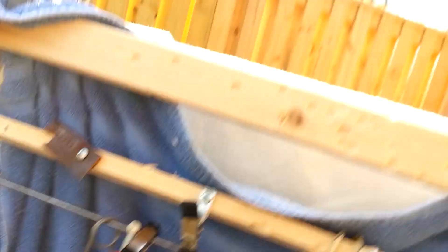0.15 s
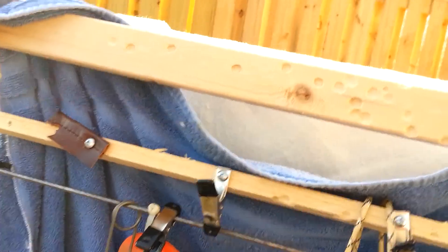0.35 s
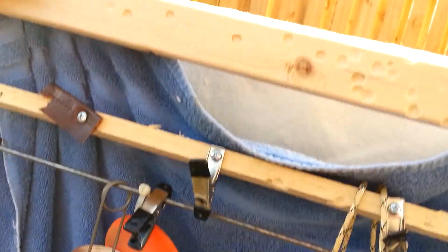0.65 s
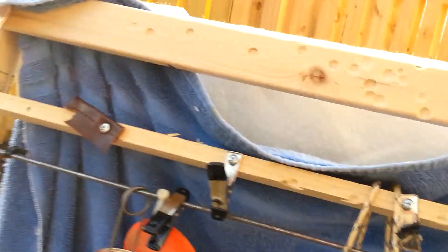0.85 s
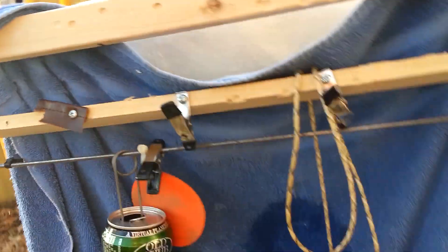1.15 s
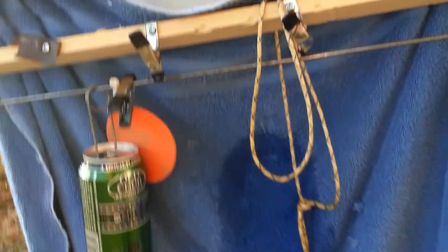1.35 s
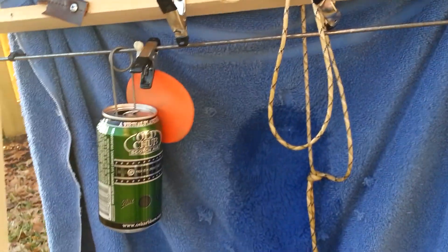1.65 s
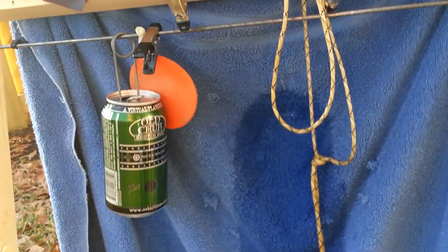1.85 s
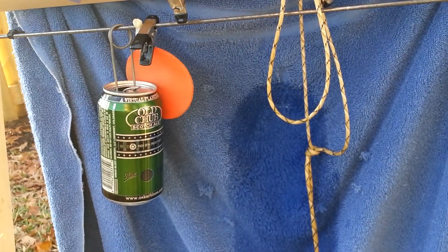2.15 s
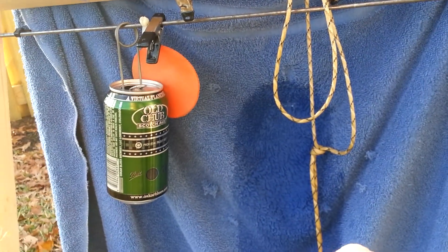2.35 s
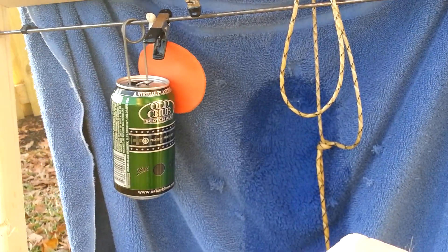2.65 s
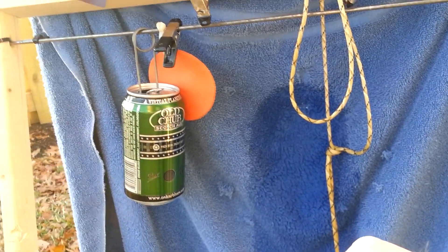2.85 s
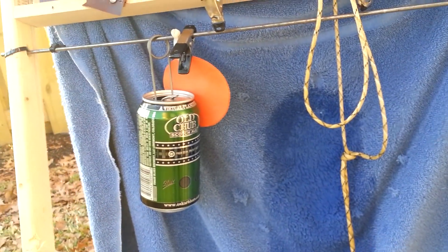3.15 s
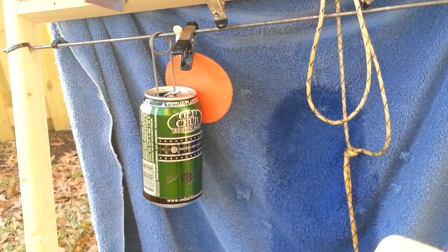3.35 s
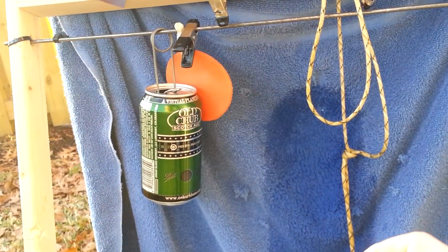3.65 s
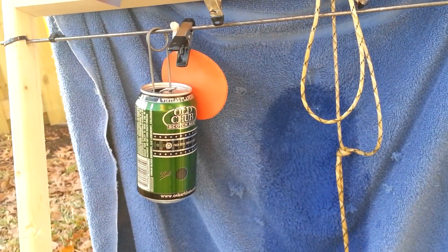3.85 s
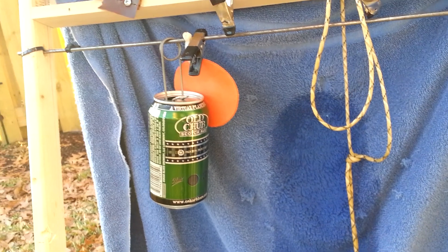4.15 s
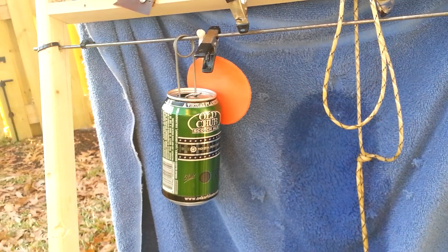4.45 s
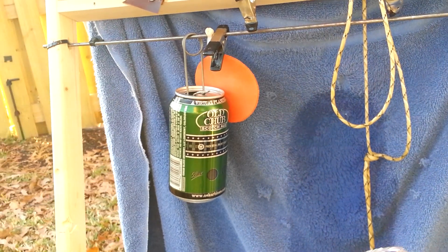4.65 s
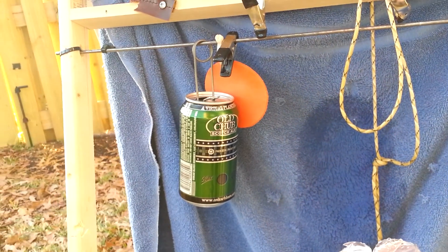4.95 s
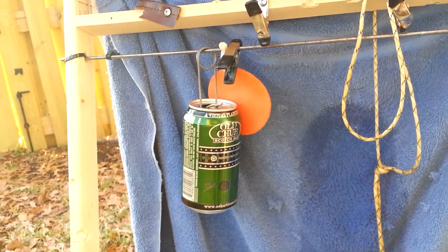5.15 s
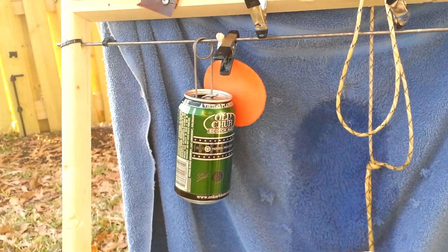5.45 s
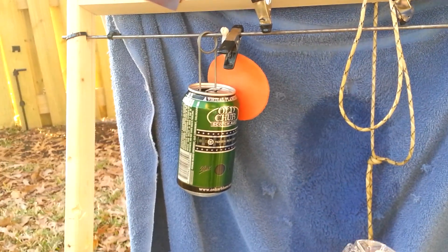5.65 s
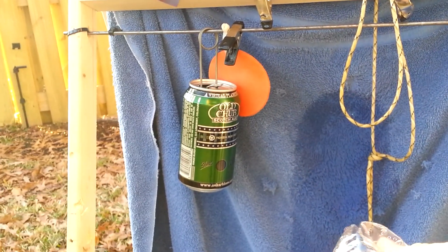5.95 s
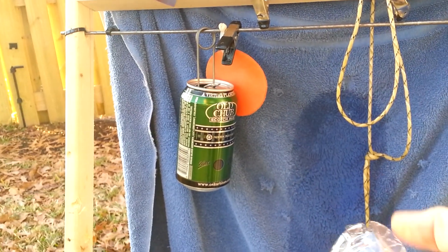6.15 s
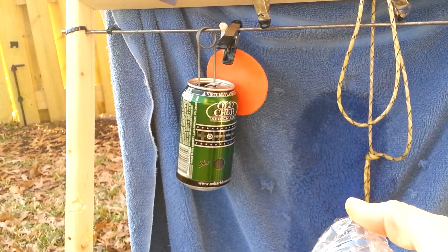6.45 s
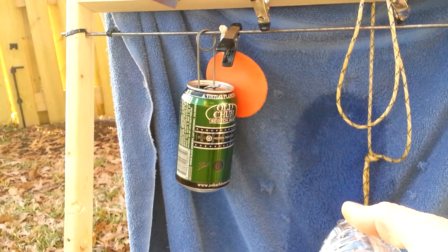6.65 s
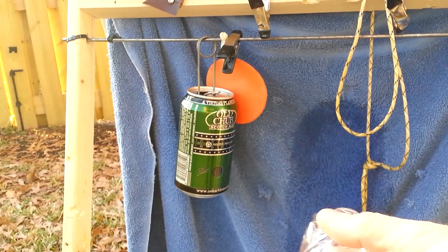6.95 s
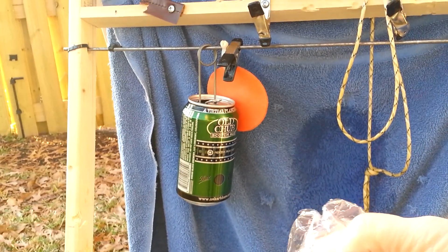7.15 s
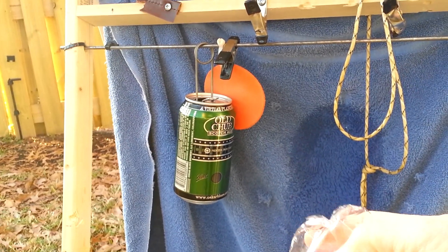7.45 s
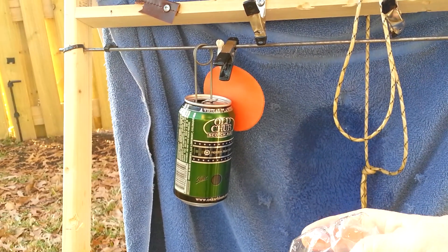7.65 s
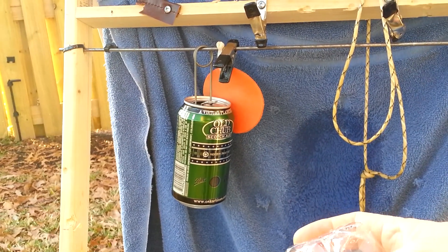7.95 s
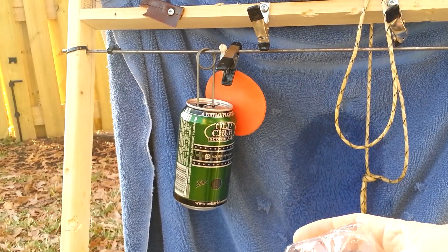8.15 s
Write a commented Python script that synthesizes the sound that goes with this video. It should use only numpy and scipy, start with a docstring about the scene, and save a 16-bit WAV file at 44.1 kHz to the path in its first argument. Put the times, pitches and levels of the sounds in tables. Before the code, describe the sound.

Sharp plastic crackles and hollow pops from a crumpling bottle, very close and slightly overloaded, gather in dense bunches against faint outdoor air and a distant motor hum.

```python
"""Buckling of a thin plastic bottle

A thin plastic bottle is squeezed and kneaded close by in a quiet yard with a far-off motor.
Creases buckle in bunches as short bursts of dense wall modes, with fine crinkle between them.
Broad panels flex with a hollow note of sagging harmonics; sliding fingers are filtered random slips.
Resonators add the notes of the still round bottle; the loud snaps overload the microphone.
"""
import sys
import numpy as np
from scipy import signal
from scipy.fft import rfft, irfft, next_fast_len
from scipy.io import wavfile
from scipy.ndimage import uniform_filter1d

SR = 44100
rng = np.random.default_rng(int(sys.argv[2]) if len(sys.argv) > 2 else 0)


def write(x):
    x = np.atleast_2d(x).T
    wavfile.write(sys.argv[1], SR, np.round(np.clip(x, -1, 1) * 32767).astype(np.int16))


N = 366471  # samples

# Open air of the yard: (frequency [Hz], relative density [dB per Hz])
YARD_SPECTRUM = [(20, -27), (40, -27), (65, -9.5), (150, -4), (190, -7), (230, -5.5), (380, -6), (700, -14),
                 (2000, -22.5), (5500, -29), (14500, -28.5)]
# Drone of the far-off motor: (multiple of the shaft speed [-], level [dB])
MOTOR_HARMONICS = [(2, -66.5), (4, -71.5), (5, -55), (8, -73)]
# Fingers slide to a new grip: (middle [s], half length [s], relative level [dB])
FINGER_SLIDES = [(0.226, 0.053, -38.5), (0.41, .05, -36.5), (0.787, 0.0099, -35.5), (0.906, .04, -42.5),
                 (1.203, 0.24, -51), (1.99, .1, -45.5), (2.153, 0.042, -39), (2.81, 0.039, -43),
                 (3.68, 0.05, -28), (4.435, 0.042, -43), (4.533, 0.025, -36)]
# Rubbing of the round bottle, with its broad resonances: (frequency [Hz], relative density [dB per Hz])
ROUND_RUB_SPECTRUM = [(200, -8), (800, -7.5), (1150, -1.5), (1600, -6), (2080, -6), (2700, -7.5),
                      (3500, -6.5), (7000, -13.5), (14500, -24.5)]
# Rubbing of the crushed bottle: (frequency [Hz], relative density [dB per Hz])
CRUSHED_RUB_SPECTRUM = [(200, 5.5), (1200, 2.5), (2300, 0), (3300, -5.5), (4100, -6), (14500, -22.5)]
# Broad panels that bend and swing: (start [s], relative level [dB], mean pitch [Hz], length [s])
PANEL_FLEXES = [(0.248, -30, 332, 0.014), (6.975, -7, 278, 0.014), (7.013, -9, 352, 0.02),
                (7.054, -21, 410, 0.011), (7.071, -23, 344, 0.0092)]
# Notes of the round bottle: (frequency [Hz], gain at resonance [dB], decay by 60 dB [s])
BOTTLE_MODES = [(247, 5.5, 0.081), (1044, 2, 0.071), (1647, -9, 0.024), (2066, -1, 0.03),
                (3596, -11, 0.065)]
# Colour of every snap, from the wall and from the microphone, which dips near 3.3 kHz and rises near 4 kHz:
# (frequency [Hz], relative density [dB per Hz])
SNAP_SPECTRUM = [(200.0, -3.5), (280.0, -1), (450.0, 2), (800.0, 0), (1300.0, 0.5), (1650.0, -1),
                 (2100.0, 1), (2700.0, 2), (3300.0, -5.5), (4000.0, -1.5), (5200.0, -7), (7500.0, -10),
                 (11000.0, -19), (14500.0, -24.5)]
# Snapping creases: (time [s], relative level [dB], pitch of the buckling facet [Hz],
# low-frequency body [dB], high-frequency edge [dB])
CREASE_SNAPS = [(0.2812, -9.5, 3220, -15.5, -5), (0.321, 8.5, 3240, -10.5, 3.5),
                (0.361, -15.5, 1600, -9, -37), (0.464, 2, 5600, -3, 7.5), (0.5517, -6.5, 3500, -16, -33),
                (0.563, -9.5, 1040, -17, 0), (0.79, -24.5, 2780, 3, -8), (0.8038, -17, 3670, 3, 5),
                (0.8391, 0, 920, -12.5, -0.5), (1.1524, -16, 3200, -7.5, -10), (1.183, -9, 3300, -10.5, -8),
                (1.3969, -34.5, 1400, 29, -10), (1.6571, -12, 1360, 2, 0), (1.756, -20, 3800, -4, -1),
                (1.8456, -13.5, 1360, -2, -12), (1.9103, 1, 2730, -13, 5.5), (1.9283, -11.5, 2070, 0, 14),
                (1.947, -11, 2100, 0, 10), (1.9559, -15.5, 1540, 9.5, 12), (2.0318, -20.5, 1390, -3, -8),
                (2.0773, -17, 1400, 5, -8), (2.333, -17.5, 2470, -14, -19), (2.4338, -18, 2080, -5, -23),
                (2.4572, -12, 1070, -2.5, -16.5), (2.514, -15.5, 1230, 11, -19),
                (2.5904, -8.5, 725, -11, -9.5), (2.8827, -13, 4330, -25, 18), (2.9128, -1, 4080, -27, -6),
                (2.9195, 3.5, 4000, -34, -4.5), (2.978, -2, 1490, -20, -3.5), (3.04, -14.5, 1400, -14, -26),
                (3.0826, -12, 1550, 5.5, -33), (3.1775, -8.5, 4500, -10, 18), (3.2398, -14, 790, -1.5, -61),
                (3.3897, -10, 4420, -12, 15.5), (3.4888, -15, 1760, -3, -22), (3.5006, -8, 810, -1, -26),
                (3.5305, -6, 2200, -7, -4), (3.537, -8, 1980, -4, -25), (3.5521, 4, 1180, 1, 17),
                (3.6259, -12, 710, -12, 4), (3.6446, -12.5, 1000, -5, -8), (3.6613, -10.5, 1520, 12, -13),
                (3.687, 0, 2250, -13, 17.5), (3.7001, -3, 10800, -5, 7), (3.7047, 1, 500, -7, 16.5),
                (3.7149, -6.5, 350, -6, -10), (3.7373, 3.5, 5100, -10, 5.5), (3.7752, -5, 2820, -1, 8),
                (3.779, -7.5, 3000, 0, 14), (3.7982, -7.5, 790, -9.5, 2), (3.8274, -14.5, 1100, -8, -2),
                (3.8608, 5.5, 4260, -7.5, 5), (3.935, -0.5, 2250, -1, 5.5), (4.0075, -12, 1100, -8, -12),
                (4.0176, -5, 980, -14, 4), (4.031, -18, 1200, -1, -19), (4.0455, -5.5, 2320, -1, 12.5),
                (4.0638, -3, 3200, -31, 11), (4.0725, -3.5, 5000, -23, 9), (4.104, -10, 810, -3, -8),
                (4.1176, 5, 1400, -13.5, 2), (4.126, 7, 2250, -1.5, 13.5), (4.1417, -6, 11000, -8, 4),
                (4.1614, 1.5, 2700, -2, 18.5), (4.193, -17, 770, 1, -5), (4.2725, -10, 8400, -6, 6),
                (4.3102, 4, 1044, 0.5, 2), (4.314, 0.5, 715, -9.5, 2), (4.437, -27.5, 2030, -15, 2),
                (4.5441, -23, 2010, -5, 6), (4.5746, -19, 840, 4, -24), (4.6382, 4, 1930, 1, 16.5),
                (4.659, -21, 4400, -11, 2), (4.6702, 2, 4900, -14.5, 2), (4.702, -20, 2500, -15, -6),
                (4.712, 2.5, 2060, -2, 18), (4.7296, -8, 740, -11, -5), (4.759, -4.5, 2500, 4.5, 11),
                (4.7888, -8, 2300, -4, 24), (4.796, -8.5, 746, -9.5, -31), (4.8366, -2, 1095, -1.5, -8),
                (4.8594, -5.5, 2660, -3, -10), (4.863, 0.5, 340, -3, 8.5), (4.8746, -11, 1900, 6.5, 14.5),
                (4.9161, -14.5, 820, 14, -4), (5.0196, 0.5, 2620, -6, 15), (5.052, -5, 2740, -1, 13),
                (5.056, -6, 2400, -7, 4), (5.0817, 2.5, 820, -3.5, 8), (5.0936, 0, 2830, -10.5, 4),
                (5.112, -50, 2800, -13, 5), (5.1217, -2.5, 4400, -10, -2), (5.1439, -4, 2440, -10.5, 1.5),
                (5.2502, -21, 4300, -8.5, 10), (5.293, -19, 604, 6, -22), (5.298, 0, 2160, -3.5, 2.5),
                (5.343, -5, 11900, -9.5, 22), (5.3588, -5.5, 3020, -6, 8), (5.369, 1, 4300, -5.5, 18),
                (5.375, 2.5, 2160, 2, 3), (5.3804, -1, 1690, -5.5, 9), (5.3929, -8, 2210, -2, 13),
                (5.4212, -14.5, 4740, 3, 20), (5.4425, -19.5, 2300, 5.5, 0), (5.46, 1.5, 2330, -7.5, 18),
                (5.4653, 3, 4700, -8, 8.5), (5.48, -9, 1100, 1.5, -23.5), (5.4867, -2, 10600, -6.5, 5.5),
                (5.506, 4.5, 2530, -9, 12.5), (5.6805, -24.5, 760, 5.5, -1), (5.7666, -31.5, 595, 3.5, -24),
                (6.3088, -25.5, 3140, 1.5, 5.5), (6.4158, -32, 750, -5, -9.5), (6.4819, -27, 2770, 4.5, -3),
                (6.6771, -20, 575, 1.5, -4.5), (6.745, -22, 3040, -10, -36), (6.893, -25.5, 410, 16, -17),
                (6.9156, -7, 2390, -15, 7), (6.9416, -2, 2250, -9, 7.5), (6.958, -28, 330, 13, 0),
                (6.9708, 0.5, 720, -5, -10), (6.9774, -7.5, 880, 12, -10), (6.994, -16, 2800, -14, 21),
                (7.0652, -18, 2230, 15, 11), (7.0735, -24.5, 1400, 21, -10), (7.1618, -2.5, 9200, -12, 4),
                (7.2014, -11, 360, 2, -1), (7.2221, -5.5, 2300, -10, 1), (7.228, -9, 2960, -10, 17),
                (7.237, -17, 2200, -10, 1), (7.2668, 2.5, 744, -6, -9), (7.303, -5.5, 3780, -13, 6.5),
                (7.37, -8.5, 1350, 1, 15.5), (7.44, -12, 3950, -16, -20), (7.4663, -3, 2210, -1.5, -11),
                (7.4961, 1.5, 1100, -6, 5), (7.5228, -9, 4500, -29, -5), (7.5658, 1.5, 1500, -32, -15.5),
                (7.7123, -2, 2540, -16, 9), (7.7316, 4.5, 2520, -13, 5.5), (7.7459, -2.5, 2600, -3.5, 2),
                (7.9557, -6, 1480, -7.5, 4), (7.9865, -4, 9000, 2.5, 11), (8.0367, -2, 2320, -2, 20.5),
                (8.0856, -7.5, 3300, -4, 0.5), (8.2649, -10, 4460, -15, -5), (8.2933, -6, 9000, -1, 13.5)]

AIR_DB, SHAFT_HZ = -49, 37.6  # rms level of the air; mean shaft speed
CRUSHED_AT_S = 1.31  # from here on the wall is too creased to hold a note
# The skin creeps a little at rest, and more while the wall gives way (relative levels)
REST_DB, CREEP_DB, GIVE_S = -51.5, -33, 0.11
# Nominal 60 dB decay of a lone crease; each neighbour within about CROWD_S adds a share; a round wall
# rings longer by a factor
RING_S, CROWD_S, PER_NEIGHBOUR, ROUND_RING_FACTOR = 0.019, 0.03, 0.059, 1.16
# The lowest note of the wall climbs as kneading divides it into ever smaller panels
LOWEST_HZ, STIFFEN_HZ_PER_S = 160.5, 9
EDGE_HZ, TOP_HZ = 14700, 16000  # band limits of the microphone


def gain_of(db):
    """Level: converts decibels to an amplitude ratio."""
    return 10 ** (np.asarray(db) / 20)


def evened(x):
    """Normalization: scales a signal to unit rms."""
    return x / np.sqrt(np.mean(x ** 2) + 1e-20)


def read(points, hz):
    """Interpolation: reads a spectrum on a logarithmic frequency axis."""
    f, value = np.transpose(points)
    return np.interp(np.log(hz + 1), np.log(f + 1), value)


def add(mix, s, sound):
    """Superposition: adds a sound to the mix at time s."""
    part = mix[max(round(s * SR), 0):][:len(sound)]
    part += sound[:len(part)]


def coloured(x, points):
    """Linear filtering: gives a steady sound a spectrum, at unit rms."""
    size = next_fast_len(N)
    gain = gain_of(read(points, np.fft.rfftfreq(size, 1 / SR)))
    return evened(irfft(rfft(x, size) * gain, size)[:N])


def wander(per_s):
    """Random modulation: joins per_s random values a second by lines, at unit rms."""
    knots = rng.standard_normal(4000)
    return evened(np.interp(np.arange(N) / SR * per_s, np.arange(len(knots)), knots))


def causal(gain):
    """Causality: the minimum-phase response rings after a blow, never before."""
    log_gain = np.log(np.maximum(gain, gain.max() * 1e-5))
    circle = np.r_[log_gain, log_gain[-2:0:-1]]
    return np.exp(np.conj(signal.hilbert(circle)))[:len(gain)]


def low_pass(x, hz):
    """Band limitation: a steep linear-phase filter."""
    return signal.oaconvolve(x, signal.firwin(301, hz, window=("kaiser", 8), fs=SR), "same")


def yard(waver_hz=0.16):
    """Stationary noise and rotation: an outdoor wash with the harmonics of a wavering shaft."""
    air = gain_of(AIR_DB) * coloured(rng.standard_normal(N), YARD_SPECTRUM)
    shaft = 2 * np.pi * np.cumsum(SHAFT_HZ + waver_hz * wander(11)) / SR
    drone = 0
    for multiple, db in MOTOR_HARMONICS:
        harmonic = np.sin(round(multiple) * shaft) * (1 + 0.24 * wander(5))
        drone = drone + gain_of(db) * evened(harmonic)
    return air + drone


def roundness(fade_s=0.19):
    """Loss of shape: falls from 1 for a round bottle to 0 for a crushed one."""
    return np.clip((CRUSHED_AT_S - np.arange(N) / SR) / fade_s, 0, 1)


def sliding():
    """Sliding contact: each slide of the fingers swells and fades as a Gaussian."""
    t = np.arange(N) / SR
    return sum(gain_of(db) * np.exp(-((t - s) / half) ** 2) for s, half, db in FINGER_SLIDES)


def strain(snaps, seconds):
    """Yielding: the wall gives way in step with the smoothed strength of its snaps."""
    span = int(seconds * SR)
    power = np.tanh(snaps) ** 2
    return np.sqrt(abs(uniform_filter1d(uniform_filter1d(power, span), span)))


def fingers(snaps, crushed_db=-3, round_db=-1, grains_per_s=2500, grain_db=2.5, unsteady_db=1.0, patchy_db=0.95):
    """Stick-slip friction: skin drags over the plastic in countless small slips."""
    grain_gain = gain_of(grain_db * np.minimum(rng.exponential(1, N), 4))
    slips = rng.standard_normal(N) * grain_gain * (rng.random(N) < grains_per_s / SR)
    creep = gain_of(CREEP_DB) * strain(snaps, GIVE_S)
    drag = np.sqrt(gain_of(REST_DB) ** 2 + creep ** 2 + sliding() ** 2)
    whole = gain_of(round_db) * coloured(slips, ROUND_RUB_SPECTRUM)
    crushed = gain_of(crushed_db) * coloured(slips, CRUSHED_RUB_SPECTRUM)
    grip_db = unsteady_db * wander(57) + patchy_db * wander(17)  # the skin catches and lets go
    return drag * gain_of(grip_db) * (roundness() * whole + (1 - roundness()) * crushed)


def stray_ticks(snaps, per_s=22, level_db=-17, slide_db=12, linger_s=0.083, low_hz=900, high_hz=4200):
    """Random buckling: now and then a strained facet gives way between the big snaps."""
    load = strain(snaps, linger_s) + gain_of(slide_db) * sliding()
    out = np.zeros(N)
    for i in np.flatnonzero(rng.random(N) < per_s / SR):
        hz = low_hz * (high_hz / low_hz) ** rng.random()
        add(out, i / SR, load[i] * snap(level_db, hz, RING_S, -2.5, -2))
    return out


def crinkle(snaps, per_s=170, level_db=-22, slide_db=12, spread_db=4, linger_s=0.029, count=12):
    """Crackling noise: tiny creases yield close around big ones and under sliding fingers."""
    load = strain(snaps, linger_s) + gain_of(slide_db) * sliding()
    sizes = gain_of(spread_db * np.minimum(rng.exponential(1, N), 3)) * load
    times = np.flatnonzero(rng.random(N) < per_s / SR)
    facets = [snap(level_db, hz, 0.016, -2.2, 2) for hz in np.geomspace(600, 4500, count)]
    which = rng.integers(0, count, N)
    out = np.zeros(N)
    for i in times:
        add(out, i / SR + linger_s / 2, sizes[i] * facets[which[i]])
    return out


def panels(overtone_db_per_octave=-17, sag=0.04, creak_db=-17, creak_hz=2200, partials=6):
    """Nonlinear flexure: a wide panel swings a few cycles, its note sagging and its folds creaking."""
    out = np.zeros(N)
    for s, db, hz, length in PANEL_FLEXES:
        u = np.arange(0, 1, 1 / (length * SR))  # fraction of the flex
        phase = 2 * np.pi * hz * length * (u + sag * u * (1 - u))
        # the stiff wall bends unevenly, which adds overtones
        swing = sum(gain_of(overtone_db_per_octave * np.log2(k)) * np.sin(k * phase)
                    for k in range(1, partials + 1))
        noise = rng.standard_normal(len(u))
        creak = evened(signal.lfilter(*signal.butter(3, creak_hz, fs=SR), noise))
        swell = np.sin(np.pi * u)
        add(out, s, gain_of(db) * swell * (swing + gain_of(creak_db) * abs(swing) * creak))
    return out


def notes(x):
    """Resonance: every snap sets the damped modes of the still round bottle ringing."""
    t = np.arange(SR // 8) / SR
    ringing = 0
    for hz, db, t60 in BOTTLE_MODES:
        unit_peak = np.log(1e6) / (t60 * SR)  # makes the gain at resonance independent of the decay
        ringing = ringing + gain_of(db - 60 * t / t60) * np.sin(2 * np.pi * hz * t) * unit_peak
    return signal.oaconvolve(x * roundness(), ringing)[:N]


def snap(db, pitch_hz, ring, body_db, edge_db, facet_db=9, facet_share=0.11, least_width_hz=320,
         damping=0.25, low_cut_hz=190, bounce_db=1.5, round_trip_s=0.001198, kick_db=0.5, kick_s=0.00086,
         size=4096):
    """Buckling: released energy excites dense wall modes, strongest around the note of the facet."""
    t, hz = np.arange(size) / SR, np.fft.rfftfreq(size, 1 / SR) + 1
    octave = np.log2(hz / 2500)
    width_squared = least_width_hz ** 2 + (facet_share * pitch_hz) ** 2
    facet = facet_db * np.exp(-(hz - pitch_hz) ** 2 / width_squared)
    body = body_db * np.clip(-(octave + 0.24) / 2, 0, 1)
    edge = edge_db * np.clip(octave / 2.23, 0, 1)
    # one bounce along the bottle cuts ridges into the spectrum; the path differs from crease to crease
    ridges = bounce_db * np.cos(2 * np.pi * hz * round_trip_s * (0.5 + rng.random()))
    spectrum_db = read(SNAP_SPECTRUM, hz) + facet + body + edge + ridges
    colour = evened(gain_of(spectrum_db) / np.hypot(1, (low_cut_hz / hz) ** 4))
    # low modes ring longer than high ones
    noise, low_share = rng.standard_normal(size), np.clip(0.4 - octave / 5, 0, 1)
    kick = 1 + gain_of(kick_db) * np.exp(-t / kick_s)  # the first push of the buckle is the hardest
    slow, fast = (rfft(noise * kick * gain_of(-60 * t / (ring * k))) for k in (1.05, 0.48))
    burst = low_share * slow + (1 - low_share) * fast
    # the sudden buckle feeds all regions of the spectrum alike
    burst_power = uniform_filter1d(abs(burst) ** 2, size=70) + 1e-12
    ring_samples = SR * ring * 2 ** (-damping * octave) / np.log(1e6)
    response = causal(colour * np.sqrt(ring_samples / burst_power))
    return gain_of(db) * irfft(burst * response)[:size // 2]


def ring_time(s):
    """Damping: a crease rings longer among neighbours and on a round wall."""
    neighbours = sum(np.exp(-((s - row[0]) / CROWD_S) ** 2) for row in CREASE_SNAPS) - 1  # less itself
    round_factor = ROUND_RING_FACTOR if s < CRUSHED_AT_S else 1
    return RING_S * (1 + PER_NEIGHBOUR * neighbours) * round_factor


def creases():
    """Conservation of energy: in each distinct snap a longer ring spreads the same energy."""
    out = np.zeros(N)
    for s, db, pitch_hz, body_db, edge_db in CREASE_SNAPS:
        ring, lowest_hz = ring_time(s), LOWEST_HZ + STIFFEN_HZ_PER_S * s
        burst = snap(db, pitch_hz, ring, body_db, edge_db, low_cut_hz=lowest_hz)
        add(out, s, np.sqrt(RING_S / ring) * burst)
    return out


def tail(x, t60, dull_hz, delay):
    """Diffuse reflection: delayed random echoes die away with dulled treble."""
    t = np.arange(SR // 2) / SR
    onset = np.clip(2 * t / delay - 1, 0, 1) ** 2
    taps = rng.standard_normal(len(t)) * gain_of(-60 * t / t60) * onset
    taps = signal.lfilter(*signal.butter(1, dull_hz, fs=SR), taps / np.linalg.norm(taps))
    return signal.oaconvolve(x, taps)[:N]


def scene(inside_db=-17, yard_echo_db=-36):
    """Superposition: snaps bounce briefly inside the bottle; the open yard returns very little."""
    snaps, flexes = creases(), panels()
    bottle = snaps + notes(snaps) + flexes + crinkle(snaps + flexes)
    inside = gain_of(inside_db) * tail(bottle, t60=0.022, dull_hz=16000, delay=0.004)
    echo = gain_of(yard_echo_db) * tail(bottle, t60=0.81, dull_hz=6000, delay=0.029)
    mix = bottle + inside + echo + fingers(snaps) + yard() + stray_ticks(snaps)
    return np.tile(mix, (2, 1))


def record(dry, lopsided=0.031, splash_db=-12, ceiling=0.98):
    """Overload: one microphone clips hard and lopsidedly, adding a soft thud to the loudest snaps."""
    clipped = np.clip(low_pass(dry.mean(0), EDGE_HZ), -ceiling, ceiling - lopsided)
    band = low_pass(clipped, EDGE_HZ)
    # only a little of the overload splashes past the band edge
    splash = gain_of(splash_db) * (clipped - band)
    return np.tile(low_pass(band + splash, TOP_HZ), (2, 1))


dry = scene()
out = record(dry)
write(out)
```